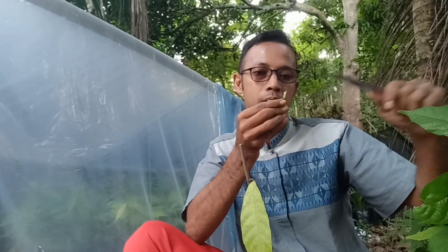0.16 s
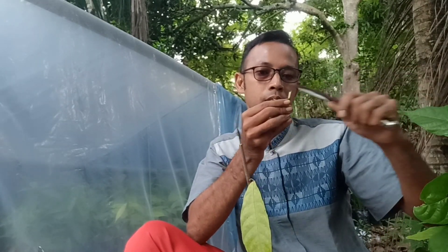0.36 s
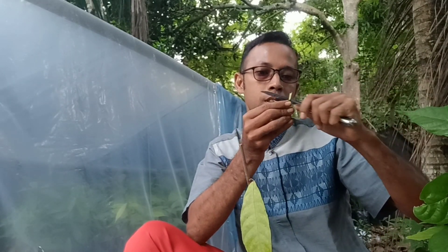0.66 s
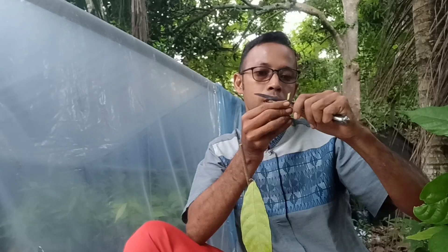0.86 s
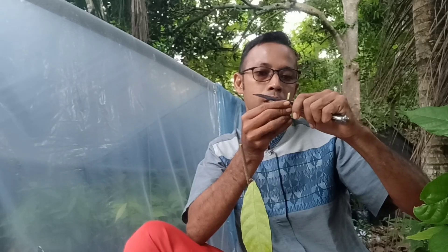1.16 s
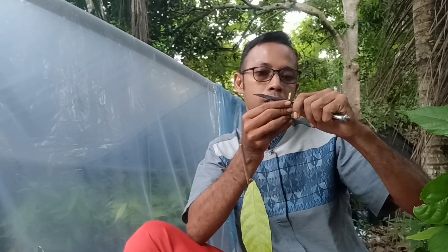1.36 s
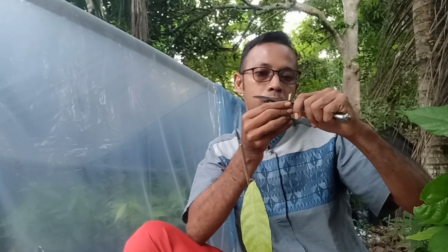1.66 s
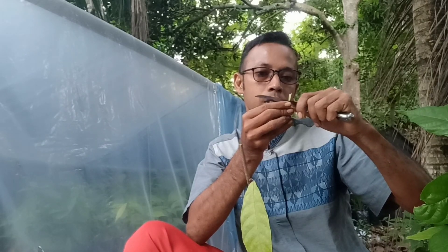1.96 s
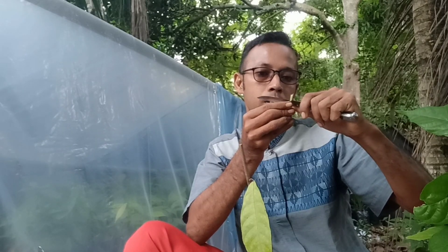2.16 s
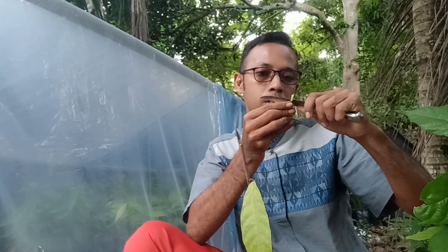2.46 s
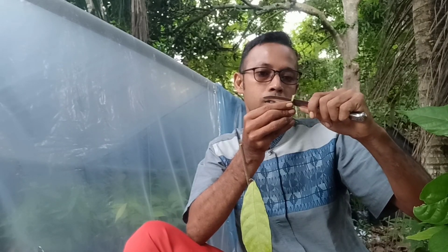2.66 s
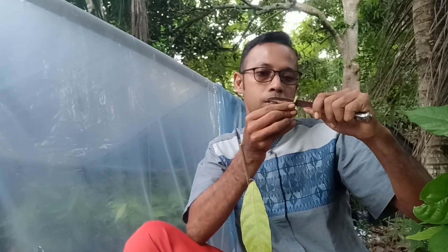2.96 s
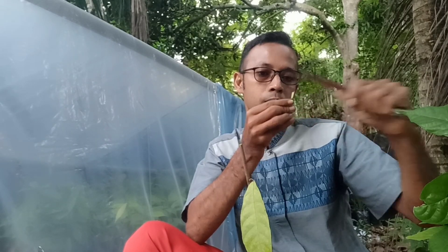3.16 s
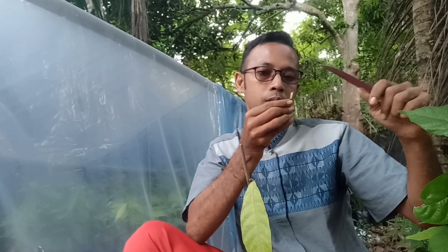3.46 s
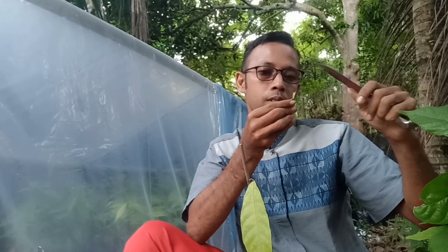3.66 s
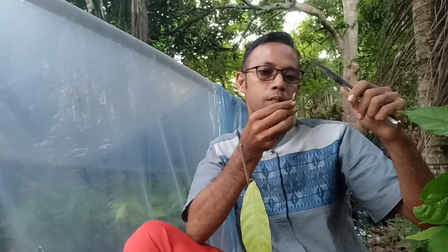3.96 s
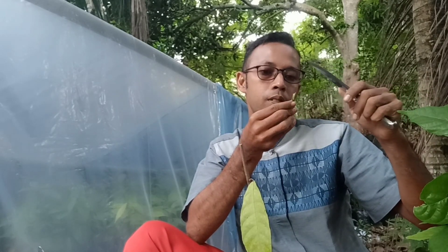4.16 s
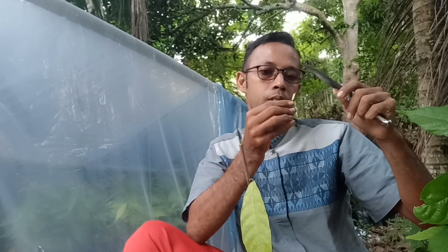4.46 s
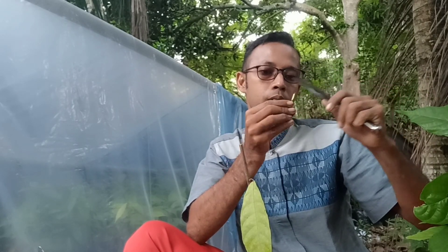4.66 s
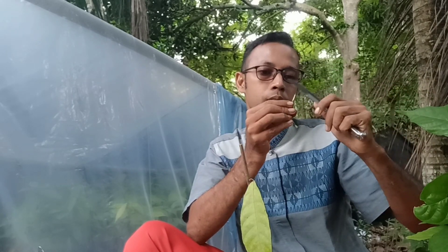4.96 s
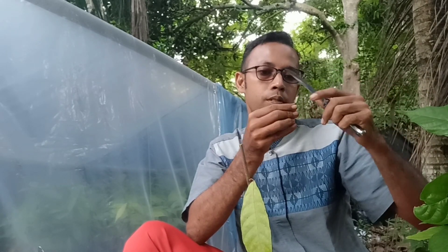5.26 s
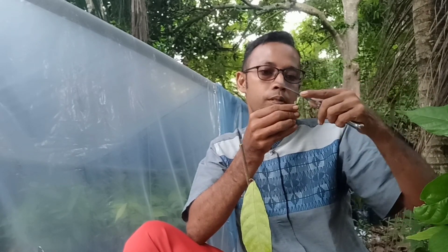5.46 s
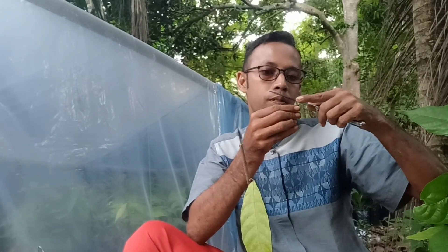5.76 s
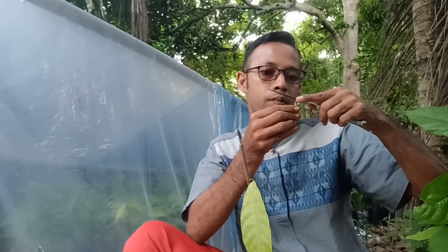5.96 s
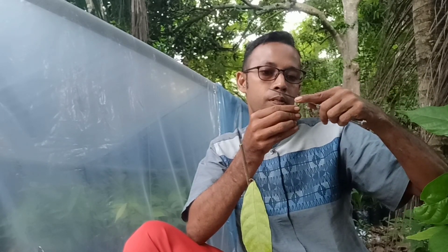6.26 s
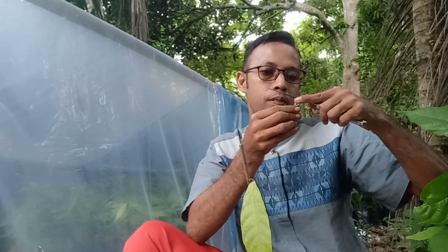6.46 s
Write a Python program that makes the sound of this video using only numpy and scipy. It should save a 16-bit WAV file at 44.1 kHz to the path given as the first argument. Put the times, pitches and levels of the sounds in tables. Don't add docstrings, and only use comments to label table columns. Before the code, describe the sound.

Outdoors, scattered piercing chick peeps and two sliding whines sound above constant insect trilling, with one early hollow wooden knock and a distant dove.

```python
import sys
import numpy as np
from scipy import signal
from scipy.fft import rfft, irfft, next_fast_len
from scipy.io import wavfile
from scipy.ndimage import uniform_filter1d, map_coordinates

SR = 44100
rng = np.random.default_rng(int(sys.argv[2]) if len(sys.argv) > 2 else 0)


def unload_audio(sound):
    columns = np.transpose(np.atleast_2d(sound))
    steps = np.round(np.clip(columns, -1, 1) * 32767)
    wavfile.write(sys.argv[1], SR, steps.astype(np.int16))


def attenuation_scalar(level_db):
    decades = np.asarray(level_db, float) / 20
    return 10 ** decades


N = 291060


def unit(x):
    return x / np.sqrt(np.mean(x ** 2) + 1e-20)


def along(points, hz):
    f, v = np.transpose(points)
    return np.interp(np.log(hz + 1), np.log(f + 1), v)


def curve(points):
    s, value = np.transpose(points)
    return np.interp(np.arange(N) / SR, s, value)


def wobble(rate):
    knots = rng.standard_normal(int(N * rate / SR) + 4)
    return map_coordinates(knots, [np.arange(N) * rate / SR])


def filtered(x, response):
    m = next_fast_len(N + 8192)
    return irfft(rfft(x, m) * response(np.fft.rfftfreq(m, 1 / SR)), m)[..., :N]


def rush(gain, patchy_db):
    z = signal.stft(rng.standard_normal(N + 512), nperseg=512)[2]
    field = uniform_filter1d(rng.standard_normal(z.shape), 5, 0)
    field = uniform_filter1d(field, 12, 1)
    patchy = signal.istft(z * attenuation_scalar(patchy_db * unit(field)), nperseg=512)[1][:N]
    return unit(filtered(patchy, gain))


def add(track, s, piece):
    part = track[round(s * SR):][:len(piece)]
    part += piece[:len(part)]


def swell(seconds, sharp):
    u = np.linspace(0, 1, max(round(seconds * SR), 8))
    return u, np.sin(np.pi * u) ** sharp


def glide(pitch):
    return np.sin(2 * np.pi * np.cumsum(pitch) / SR)


def yard(x):
    # (frequency [Hz], t60 [s])
    decay = [(500, 0.093), (1200, 1), (2500, 0.4), (3500, 0.51), (5000, 0.2), (8000, 0.2)]
    wet, hop = np.zeros(N), SR // 3
    for k in range(0, N, hop):
        hz, t, z = signal.stft(rng.standard_normal(SR // 2), SR, nperseg=256)
        early = 1.6 * np.exp(-t / .014)
        late = attenuation_scalar(-60 * t / along(decay, hz)[:, None])
        tail = signal.istft(z * (late + early), SR, nperseg=256)[1]
        add(wet, k / SR + .003, signal.fftconvolve(x[k:k + hop], tail / np.linalg.norm(tail)))
    return wet


def peep(knee_s, lead_s, droop_hz, fall_s, top_hz, db, fall, level_db, octave_db):
    end_hz, lead_db, usual_db = 2250, -48, -30
    u, left = np.transpose(fall)
    effort = db - usual_db
    left = left + .012 * max(effort, 0) * np.sin(np.pi * u)
    fall_db = db + np.array(level_db) - .5 * effort * np.clip(4 * u - 1, 0, 1)
    s = np.r_[knee_s - lead_s, knee_s - .015, knee_s + fall_s * u]
    hz = np.r_[top_hz + droop_hz, top_hz + 40, end_hz + (top_hz - end_hz) * left]
    level = np.r_[lead_db - 2 + .4 * effort, lead_db + 3 + .4 * effort, fall_db]
    return s, hz, level, .7 * effort + octave_db


def whine(s, slide_s, drop_s, top_hz, db):
    knee_hz, floor_hz, fade_s = 3560, 2550, .014
    slide = [(0, 1), (.25, .8), (.5, .5), (.84, .25), (1, 0)]
    slide_db = [-16, -7, -1.5, -1, -7]
    u, left = np.transpose(slide)
    times = s + np.r_[slide_s * u, slide_s + drop_s, slide_s + drop_s + fade_s]
    hz = np.r_[knee_hz + (top_hz - knee_hz) * left, floor_hz, floor_hz - 150]
    return times, hz, db + np.r_[slide_db, -2.5, -20], 0


def chicks():
    # (time [s], pitch [Hz], level [dB])
    opening = [
        [(0, 4550, -26), (.012, 4560, -18), (.036, 4530, -20.5), (.048, 4400, -27), (.062, 3600, -35),
         (.085, 2750, -47)],
        [(.14, 4350, -42), (.165, 3980, -41), (.24, 3880, -43), (.255, 4040, -41), (.285, 4180, -50),
         (.295, 3820, -48), (.325, 3600, -39), (.345, 3600, -66)],
    ]
    # (fall start [s], lead-in [s], fall [s], top [Hz], effort [dB])
    straight = [
        (.912, .04, .088, 4830, -28),
        (1.606, .03, .074, 4750, -35),
        (2.922, .075, .082, 4860, -23),
    ]
    # (fall start [s], lead-in droop [Hz], fall [s], top [Hz], effort [dB])
    kinked = [
        (4.042, 30, .093, 4940, -32),
        (5.28, 300, .106, 4940, -34),
        (5.717, 110, .082, 5230, -29),
    ]
    # (time [s], slide [s], drop [s], top [Hz], level [dB])
    whines = [
        (2.5, .218, .043, 4900, -35),
        (6.425, .124, .018, 4600, -41),
    ]
    straight_fall = [(0, 1), (.1, .95), (.24, .81), (.5, .53), (.74, .29), (.88, .13), (1, 0)]
    kinked_fall = [(0, 1), (.08, .96), (.18, .84), (.36, .53), (.62, .34), (.86, .14), (1, 0)]
    straight_db = [-9, -2, -1, -7, -10, -6, -17]
    kinked_db = [-12, -6, 0, -3, -10, -3.5, -13]
    kinked_lead_s = .12

    calls = [peep(s, lead, 0, *rest, straight_fall, straight_db, octave_db=8) for s, lead, *rest in straight]
    calls += [peep(s, kinked_lead_s, *rest, kinked_fall, kinked_db, octave_db=-2) for s, *rest in kinked]
    calls += [whine(*row) for row in whines]
    calls += [(*np.transpose(rows), 0) for rows in opening]
    out, quaver = np.zeros(N), wobble(70)
    for s, hz, db, octave_db in calls:
        t = np.arange(s[0], s[-1], 1 / SR)
        pitch = uniform_filter1d(np.interp(t, s, hz), size=200)
        if s[0] > 0:
            pitch = pitch + 30 * quaver[round(s[0] * SR):][:len(t)]
        turn = 2 * np.pi * np.cumsum(pitch) / SR
        octave = attenuation_scalar(octave_db + np.interp(pitch, [2550, 2800, 3550, 3900], [-36, -19, -21, -65]))
        voice = np.sin(turn) + octave * np.sin(2 * turn) + attenuation_scalar(-37) * np.sin(3 * turn)
        from_start = t - s[0] + (s[0] == 0)
        ends = np.clip(np.minimum(from_start, s[-1] - t) / 0.014, 0, 1)
        add(out, s[0], np.sqrt(2) * attenuation_scalar(np.interp(t, s, db)) * ends * voice)
    return out * attenuation_scalar(1.8 * wobble(140))


def crickets():
    # (wing resonance [Hz], stroke rate [1/s], level [dB])
    singers = [(4570, 59, -4.5), (4520, 63, -7), (4482, 60, -4.5), (4664, 84, -6.5), (4350, 27, -10),
               (4237, 48, -14), (5050, 87, -31)]
    # (time [s], level [dB])
    trill = [(0.25, -45.5), (0.62, -52), (1.13, -48), (1.61, -46.5), (1.96, -48), (2.83, -45.5),
             (3.15, -52), (3.71, -47.5), (4.85, -46.5), (5.48, -50.5), (5.89, -45.5), (6.6, -47)]
    choir = np.zeros(N)
    for hz, rate, db in singers:
        stroke = np.cumsum(rate * (1 + 0.0141 * wobble(3.01))) / SR + 3 * rng.random()
        count = stroke.astype(int)
        uneven_db = rng.normal(0, 2.2, count.max() + 1)[count]
        size = attenuation_scalar(np.array([0, -1.5, -6])[count % 3] + uneven_db)
        tone = glide(hz + 18 * wobble(25))
        choir += attenuation_scalar(db) * size * np.sin(np.pi * (stroke % 1)) ** 2.3 * tone
    return attenuation_scalar(curve(trill) + 2) * unit(unit(choir) + attenuation_scalar(-8) * unit(yard(choir)))


def cicadas():
    # (time [s], length [s], level [dB])
    bursts = [(0, 0.2, -49), (0.257, 0.36, -52), (0.752, 0.58, -62), (1.35, 0.47, -60), (1.956, 0.35, -54),
              (2.32, 0.31, -49), (2.597, 0.3, -46), (2.98, .32, -46), (3.548, .3, -58), (3.89, 0.38, -59),
              (5.33, 0.38, -49.5), (5.707, 0.3, -49), (6.006, 0.49, -51)]
    # (frequency [Hz], width [Hz], level [dB])
    resonances = [(7586, 150, 3), (7335, 340, 4.5), (7910, 270, -9.5), (8230, 300, -6)]
    murmur_db = -56
    chorus = np.full(N, attenuation_scalar(murmur_db))
    for s, seconds, db in bursts:
        add(chorus, s, attenuation_scalar(db) * swell(seconds, sharp=1.5)[1])

    def body(f):
        return sum(attenuation_scalar(db) * np.exp(-((f - hz) / width) ** 2) for hz, width, db in resonances)

    return chorus * attenuation_scalar(0.83 * wobble(13)) * rush(body, patchy_db=2.0)


def traffic():
    # (frequency [Hz], level [dB per Hz])
    hum = [(18, -69), (30, -57), (48, -19), (78, -4.5), (103, 2), (225, -8), (346, -10.5), (542, -16.5),
           (817, -16), (2320, -26.5), (2600, -35), (3380, -56), (5720, -120)]
    # (time [s], level [dB])
    passing = [
        (0, -70),
        (.4, -63),
        (.65, -73),
        (3.5, -75.5),
        (5.0, -58.5),
        (6.15, -57.5),
        (6.6, -68),
    ]
    tyre_db = curve(passing)
    rush_db = -51.5 + 0.07 * (tyre_db - tyre_db.mean())

    def low(f):
        return 1 / (1 + (f / 260) ** 4)

    rumble = rush(lambda f: attenuation_scalar(along(hum, f)) * np.sqrt(low(f)), patchy_db=-1.5)
    mid = rush(lambda f: attenuation_scalar(along(hum, f)) * np.sqrt(1 - low(f)), patchy_db=2.0)
    tyres = rush(lambda f: np.exp(-((f - 1450) / 420) ** 2), patchy_db=2)
    return attenuation_scalar(-45.5 + 0.4 * wobble(2.534)) * rumble + attenuation_scalar(rush_db) * mid + attenuation_scalar(tyre_db + .5) * tyres


def far_insects():
    # (frequency [Hz], level [dB per Hz])
    haze = [(2000, -13.5), (2600, -5), (3300, -2), (4000, -1), (5000, 2), (5600, 0), (6300, 5.5),
            (6800, -1), (7500, -5.5), (8500, -12.5), (8700, -15.5), (10000, -8.5), (11000, -25),
            (11600, -21.5)]
    hiss = rush(lambda f: attenuation_scalar(along(haze, f)) * (f < 11700), patchy_db=1.7)
    return attenuation_scalar(-48.5 + 0.13 * wobble(2.74)) * hiss


def far_birds():
    # (time [s], length [s], pitch
    # [Hz], level [dB])
    flock = [(.22, .12, 2940, -55), (.48, .1, 3220, -58), (1.0, .09, 3100, -57), (1.21, .11, 3250, -58),
             (1.48, .08, 3220, -57), (2.2, .2, 3130, -60), (2.42, .07, 2920, -55), (2.58, .05, 2900, -56),
             (2.63, .08, 2950, -53), (3.32, .08, 2650, -59), (3.49, .05, 3650, -63), (3.895, .2, 2970, -52),
             (4.35, .15, 2910, -60), (4.6, .13, 3020, -58), (5.17, .05, 3140, -58), (5.59, .1, 3100, -58),
             (5.67, .08, 2940, -52), (6.03, .09, 3020, -58), (6.12, .06, 2770, -60), (6.38, .1, 3020, -62)]
    # (time [s], length [s], pitch [Hz], level [dB])
    pipes = [(.055, .025, 4550, -33), (.08, .1, 4570, -44), (.51, .45, 830, -66), (.51, .2, 1690, -67),
             (.896, .03, 6450, -44), (.92, .05, 6400, -54), (.92, .06, 8320, -60), (.96, .15, 4300, -54),
             (1.5, .09, 5120, -59), (2.47, .05, 6150, -55), (5.07, .05, 6170, -55), (5.81, .12, 1765, -63),
             (6.09, .12, 1745, -63)]
    # (time [s], length [s], first pitch [Hz], last pitch [Hz], level [dB])
    swoops = [
        (.888, .014, 5000, 6500, -45),
        (.99, .09, 4400, 3000, -56),
        (1.81, .05, 2750, 3400, -58),
    ]
    sag_hz_per_s = 1500
    notes = [(s, seconds, hz, hz - sag_hz_per_s * seconds, db - 2.0) for s, seconds, hz, db in flock]
    notes += [(s, seconds, hz, hz, db) for s, seconds, hz, db in pipes]
    out, waver = np.zeros(N), wobble(110)
    for s, seconds, first_hz, last_hz, db in notes + swoops:
        u, shape = swell(seconds, sharp=.4)
        unsteady = np.minimum(55, .02 * first_hz) * waver[round(s * SR):][:len(u)]
        pitch = first_hz + (last_hz - first_hz) * u + unsteady
        add(out, s, attenuation_scalar(db + 7.5) * shape * glide(pitch))
    return out * attenuation_scalar(2.2 * wobble(70))


def knocks():
    # (time [s], peak level [dB], brightening [dB per mode])
    strikes = [
        (0.2027, -15.5, 2.2),
        (0.3377, -38.5, 5),
    ]
    # (frequency [Hz], level [dB], t60 [s])
    hollow = [(491, 4.5, 0.088), (426, -4, 0.15), (843, 6, 0.025), (1170, -7, 0.036), (1773, -9.5, 0.04),
              (2080, -13.5, 0.015), (3080, -4, 0.0045)]
    out, t = np.zeros(N), np.arange(SR // 5) / SR
    onset = 1 - np.exp(-t / 0.00067)
    for s, db, bright_db in strikes:
        ring = np.zeros(len(t))
        for k, (hz, mode_db, t60) in enumerate(hollow):
            ring += attenuation_scalar(mode_db + k * bright_db - 60 * t / t60) * np.sin(2 * np.pi * hz * t)
        crack = 0.21 * attenuation_scalar(5 * bright_db - 60 * t / 0.028) * rng.standard_normal(len(t))
        add(out, s, attenuation_scalar(db - 9.0) * (ring + uniform_filter1d(crack, size=5)) * onset)
    return out


def dove():
    # (time [s], slowness [ratio], level [dB])
    coos = [
        (.41, .972, -.5),
        (5.679, 1.025, -2.5),
    ]
    # (time into the phrase [s], length [s], cluck level [dB], arch level [dB])
    phrase = [(0, .032, -48, -53), (.035, .036, -68, -51), (.092, .036, -67, -51), (.153, .055, -51, -60),
              (.235, .06, -53, -57), (.325, .05, -52.5, -54), (.44, .066, -54, -51),
              (.622, .068, -55.5, -52), (.808, .07, -57.5, -51)]
    out = np.zeros(N)
    for start, slow, db in coos:
        for after, seconds, cluck_db, arch_db in phrase:
            s = start + slow * after
            u, shape = swell(.03, sharp=.8)
            add(out, s, attenuation_scalar(db + cluck_db + 7) * shape * glide(950 + 100 * u))
            u, shape = swell(seconds + .02, sharp=.45)
            pitch = 1070 + 165 * np.sin(np.pi * u ** .8) ** .45 + 12 * rng.standard_normal()
            add(out, s + .01, attenuation_scalar(db + arch_db + 4.2) * shape * glide(pitch))
    return out * attenuation_scalar(1.6 * wobble(70))


def leaves():
    # (time [s], length [s], level [dB])
    rustles = [
        (3.125, .018, -51),
        (3.08, .1, -55),
        (4.57, .2, -54),
        (4.07, .07, -57),
        (5.8, .16, -58),
        (6.08, .14, -59),
        (.885, .1, -54),
    ]
    colour = [(150, -18), (320, 12), (1400, 1.5), (2500, 2.5), (7000, -18), (10000, -16), (14000, -21)]  # (Hz, dB)
    gate = np.zeros(N)
    for s, seconds, db in rustles:
        add(gate, s, attenuation_scalar(db) * swell(seconds, sharp=0.14)[1])
    grain = attenuation_scalar(2.3 * wobble(300))
    return gate * unit(grain * rush(lambda f: attenuation_scalar(along(colour, f)), patchy_db=3.0))


def takeoff():
    out = np.zeros(N)
    u = swell(.095, sharp=1)[0]
    rasp = rush(lambda f: np.exp(-((f - 5850) / 800) ** 4), patchy_db=1.5)[SR:][:len(u)]
    shape = np.minimum(1, 20 * u) * (1 - .6 * u) * np.minimum(1, 8 - 8 * u)
    add(out, .89, attenuation_scalar(-44) * shape * unit(rasp))
    return out


def katydid():
    # (time [s], length [s], pitch [Hz], level [dB])
    buzzes = [
        (2.678, .072, 7232, -46),
        (2.755, .12, 7232, -55),
        (1.575, .07, 7050, -56),
    ]
    out = np.zeros(N)
    for s, seconds, hz, db in buzzes:
        u, shape = swell(seconds, sharp=0.25)
        t = u * seconds
        pulses = 1 - 0.69 * np.cos(2 * np.pi * 50 * t)
        add(out, s, attenuation_scalar(db + 10.0) * shape * pulses * np.sin(2 * np.pi * hz * t))
    return out


def scene():
    near, far, coo, wood = chicks(), far_birds() + takeoff(), dove(), knocks()
    scatter = yard(attenuation_scalar(-3.5) * near + attenuation_scalar(-1) * far + attenuation_scalar(-8) * coo + attenuation_scalar(-16) * wood)
    calls = attenuation_scalar(-1.5) * near + attenuation_scalar(-5) * far + attenuation_scalar(-.5) * coo + wood + scatter
    insects = crickets() + cicadas() + katydid() + far_insects()
    return np.tile(calls + insects + leaves() + traffic(), (2, 1))


def top_cut(x):
    return signal.sosfilt(signal.butter(12, 16720, fs=SR, output="sos"), x)


def record(dry):
    # (frequency [Hz], level [dB per Hz])
    fizz = [(11500, -39), (11750, -2), (13000, -2.5), (14500, 1.5), (15400, 2), (15550, -60)]
    flipped = dry * (-1.) ** np.arange(N)
    mirror = filtered(flipped, lambda f: attenuation_scalar(along(fizz, f) - 16.5))
    mid = dry + mirror + attenuation_scalar(-61) * rush(lambda f: attenuation_scalar(along(fizz, f)), patchy_db=2.3)
    side = attenuation_scalar(-94.5) * rush(lambda f: f > 4700, patchy_db=1.0)
    stereo = filtered(mid + side * [[1], [-1]], lambda f: f < 15520)
    return top_cut(stereo - .0008)


dry = scene()
out = record(dry)
unload_audio(out)
```